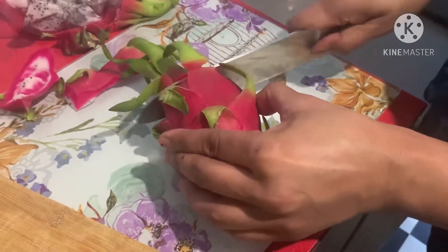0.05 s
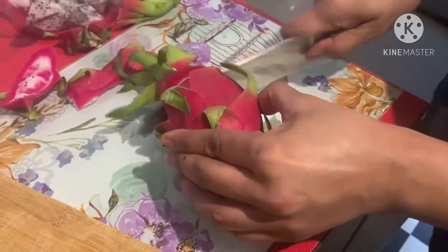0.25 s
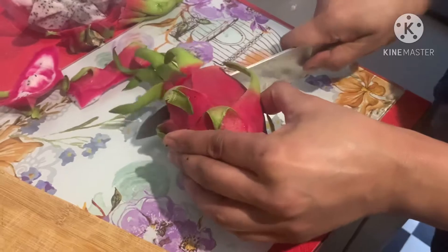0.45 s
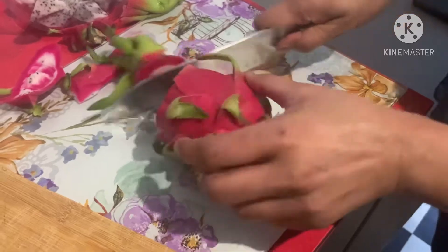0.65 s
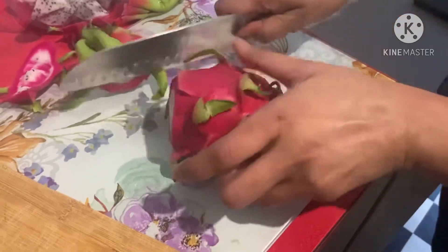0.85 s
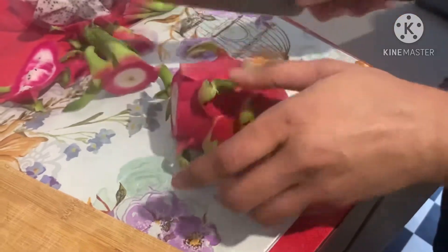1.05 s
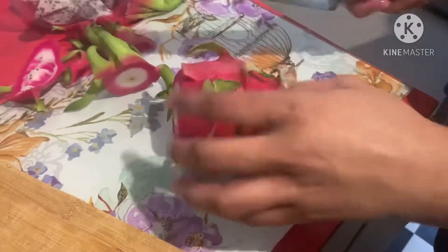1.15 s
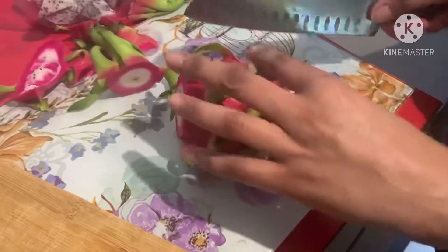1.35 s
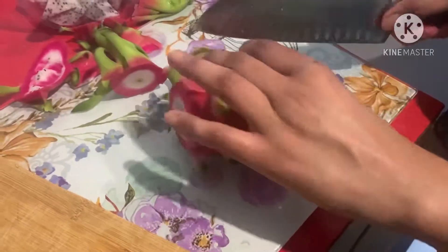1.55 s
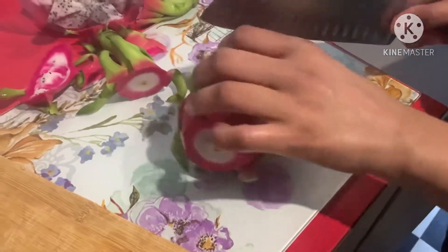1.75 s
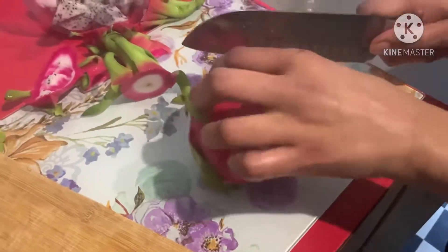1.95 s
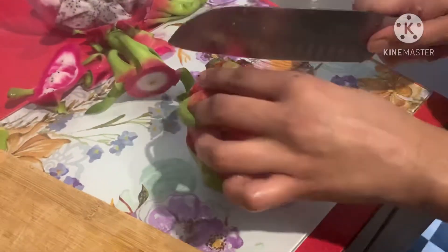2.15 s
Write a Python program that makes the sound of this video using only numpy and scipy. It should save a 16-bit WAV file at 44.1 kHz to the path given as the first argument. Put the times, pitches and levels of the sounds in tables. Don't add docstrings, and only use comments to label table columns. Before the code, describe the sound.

A knife cut through fruit, close up in stereo. Crisp wet rustling opens the first 0.15 seconds; at 0.2 a sharp snap leads to a gritty skid, a brief falling squeal and a hard knock with tiny bounces by 0.25, ringing shortly in the room. A small tick comes near 0.67, then faint finger rustles, with light ticks and dull pops around 1.9-2.1. Low airy rumble, wavering motor hum and slight hiss continue throughout.

```python
import sys
import numpy as np
from scipy import signal
from scipy.io import wavfile
from scipy.ndimage import uniform_filter1d

SR = 44100
rng = np.random.default_rng(int(sys.argv[2]) if len(sys.argv) > 2 else 0)


def digitize_waveform(pressure):
    field = np.atleast_2d(pressure).T
    bounded = np.clip(field, -1, 1)
    quanta = np.round(bounded * 32767).astype(np.int16)
    wavfile.write(sys.argv[1], SR, quanta)


def linear_from_db(decibels):
    return 10 ** (np.asarray(decibels, float) / 20)


N = 97020


def evened(x):
    return x / np.sqrt(np.mean(x ** 2) + 1e-20)


def read(points, hz):
    f, value = np.transpose(points)
    return np.interp(np.log(hz + 1), np.log(f + 1), value)


def highpass(x, hz):
    return signal.sosfilt(signal.butter(2, hz, "high", fs=SR, output="sos"), x)


def resonate(x, hz, width_hz):
    pole = np.exp((2j * hz - width_hz) * np.pi / SR)
    return 2 * signal.lfilter([1 - abs(pole)], [1, -pole], x).real


def resonate_twice(x, hz, width_hz):
    return resonate(resonate(x, hz, width_hz), hz, width_hz)


def grit(per_s, spread_db):
    sign_and_size = rng.standard_normal((3, N))
    unevenness = linear_from_db(spread_db * np.minimum(rng.exponential(1, (3, N)), 4))
    present = rng.random((3, N)) < per_s / SR
    clicks = sign_and_size * unevenness * present
    return evened(clicks[:2] + 0.59 * clicks[2])


def hiss():
    level_db, low_cut_hz = -78.5, 6000
    return linear_from_db(level_db) * highpass(rng.standard_normal((2, N)), low_cut_hz)


# (frequency [Hz], density [dB/Hz])
AIR_SPECTRUM = [(25, -30.5), (60, -22), (150, -19), (300, -21.5), (450, -27.5), (700, -35.5), (2000, -46),
                (5000, -59), (15000, -68.5)]
# (frequency [Hz], correlation [-])
AIR_LIKENESS = [(60, .9), (130, .92), (290, .7), (640, .25), (1400, .1), (3000, 0.01)]
# (time [s], level on the air [dB])
AIR_SWELL = [(0, -1.5), (.18, -5.5), (.3, 3.5), (.5, 5), (.67, -1), (0.779, 2.5), (.92, 4), (1.0, 0),
             (1.15, 3), (1.45, -.5), (1.7, -2), (1.86, -2), (1.945, -0.03), (1.961, -7), (1.99, -5.5),
             (2.01, 0), (2.2, 2.5)]


def air():
    level_db, patch_db, hop = -54.5 - 3.5, 2.2, 256
    frames, hz = N // hop + 5, np.fft.rfftfreq(1024, 1 / SR)
    a, b, c, d, patches = rng.standard_normal((frames, 513, 5)).T
    patches = uniform_filter1d(patches, size=12, axis=0)
    patches = evened(uniform_filter1d(patches, size=14, axis=1))
    likeness = np.clip(read(AIR_LIKENESS, hz), -1, 1)[:, None]
    left = a + 1j * b
    right = likeness * left + np.sqrt(1 - likeness ** 2) * (c + 1j * d)
    swell_db = np.interp(np.arange(frames) * hop / SR, *np.transpose(AIR_SWELL))
    spectrum_db = read(AIR_SPECTRUM, hz)[:, None] + patch_db * patches + swell_db
    z = np.array([left, right]) * linear_from_db(spectrum_db)
    return linear_from_db(level_db) * evened(signal.istft(z, nperseg=1024, noverlap=768)[1][:, :N])


# (centre [Hz], width [Hz], level [dB])
HUM_BANDS = [(50, 20, -68.5), (107.3, 6.7, -66), (189.5, 16, -62)]
# (time [s], main hum level [dB])
MOTOR_LOAD = [(0.0, -55), (0.12, -67), (0.24, -46.5), (0.29, -70), (0.51, -65), (0.56, -51), (0.69, -66.5),
              (0.73, -54), (1.1, -49), (1.14, -68), (1.21, -50), (1.33, -67), (1.379, -51.5), (1.51, -61),
              (1.54, -52.5), (2.01, -59.5), (2.04, -48), (2.2, -51)]


def hum():
    main_hz, main_width_hz = 150, 17
    noise = rng.standard_normal((3, N))
    noise = noise[2] + .25 * noise[:2]
    bands = np.zeros((2, N))
    for hz, width_hz, db in HUM_BANDS:
        bands += linear_from_db(db) * evened(resonate_twice(noise, hz, width_hz))
    main = resonate_twice(noise, main_hz, main_width_hz)
    envelope = abs(signal.hilbert(main.mean(0))) / main.std()
    main = main / (envelope + 1.4) / main.std()
    load_db = np.interp(np.arange(N) / SR, *np.transpose(MOTOR_LOAD))
    return (bands + evened(main) * linear_from_db(load_db)) * linear_from_db(np.array([[-1.2], [1.2]]))


# (time [s], level [dB], corner [Hz])
POPS = [
    (1.9015, -57.5, 599),
    (1.9405, -59.5, 903),
    (1.9514, -52.5, 898),
    (2.002, -50, 900),
    (2.0915, -52, 700),
    (2.112, -60, 500.6),
]


def pops():
    out, t = np.zeros(N), np.arange(400) / SR
    for s, db, hz in POPS:
        phase = np.pi * hz * t
        start = round(s * SR)
        out[start:start + 400] -= linear_from_db(db) * (1 - phase) * np.exp(-phase)
    return out


# (start [s], length [s])
STROKES = [(-.08, .13), (.015, .1), (.01, .11), (-.01, .13), (.1, .17), (.25, .38), (.38, .34), (.66, .055),
           (.66, .11), (.72, .15), (.88, .04), (.87, .07), (1.06, .14), (1.2, .09), (1.2, .09), (1.2, .08),
           (1.4, .05), (1.52, .05), (1.53, .03), (1.84, .1), (1.875, .085), (2.015, .04), (2.075, .04),
           (2.0, .2)]
# (level [dB], centre [Hz], width [Hz])
STROKE_COLOURS = [(-44.5, 12000, 14500), (-45.5, 15000, 15000), (-56.5, 790, 5800), (-58, 690, 50),
                  (-58.5, 6500, 9100), (-60, 350, 120), (-71, 7800, 16000), (-59.5, 1760, 4500),
                  (-70.5, 9200, 7900), (-74.5, 2330, 1100), (-70.5, 11200, 6400), (-72.5, 2400, 4600),
                  (-77.5, 2200, 2100), (-71.5, 3100, 1260), (-70, 1050, 330), (-79, 8800, 2300),
                  (-80, 2600, 5000), (-73.5, 1700, 1600), (-77.5, 10000, 3300), (-72, 1020, 530),
                  (-67.5, 8350, 470), (-63.5, 9100, 5500), (-72, 7700, 4600), (-79.5, 2800, 2200)]


def rustles():
    grains = grit(per_s=6000, spread_db=3.0)
    t, out = np.arange(N) / SR, np.zeros((2, N))
    for (s, length_s), (db, hz, width_hz) in zip(STROKES, STROKE_COLOURS):
        on = (t > s) & (t < s + length_s)
        arch = np.sin(np.pi * (t[on] - s) / length_s)
        out[:, on] += linear_from_db(db) * arch * evened(resonate_twice(grains[:, on], hz, width_hz))
    return out


# (time [s], peak level [dB], centre [Hz], width [Hz])
TICKS = [(.0295, -46, 9700, 1500), (0.035, -38, 3900, 795), (0.186, -45, 7900, 3000),
         (0.2007, -16.5, 10600, 2500), (0.215, -23.5, 6500, 2500), (0.671, -38, 4530, 7170),
         (.906, -62, 4020, 702.6), (0.915, -63.5, 6990, 3000), (1.321, -51, 12590, 6967),
         (1.887, -61.5, 8290, 1199), (1.897, -59.5, 8480, 1502), (1.901, -54, 8600, 1490),
         (1.91, -51.5, 9090, 2500), (1.928, -61.5, 8500, 1501), (1.94, -47.5, 8910, 1482),
         (1.943, -56, 9090, 1480), (1.949, -53, 9250, 1972), (.6705, -43, 1150, 500), (.672, -45, 800, 300),
         (.674, -46, 2000, 900), ]


def ticks():
    decay_s = .0006
    out, t = np.zeros((2, N)), np.arange(800) / SR
    for s, db, hz, width_hz in TICKS:
        noise = rng.standard_normal((3, 800))
        burst = (noise[2] + .5 * noise[:2]) * np.exp(-t / decay_s)
        snap = resonate_twice(burst, hz, width_hz)
        start = round(s * SR)
        out[:, start:start + 800] += linear_from_db(db) * snap / abs(snap).max()
    return out


# (start [s], end [s], start pitch [Hz], end pitch [Hz], waver width [Hz], level [dB])
SQUEAL = (0.2135, 0.2566, 2010, 1771, 89.5, -22)


def squeal():
    start_s, end_s, from_hz, to_hz, waver_hz, db = SQUEAL
    u = np.clip((np.arange(N) / SR - start_s) / (end_s - start_s), 0, 1)
    waver_rad = 0.69 * evened(resonate(rng.standard_normal(N), 0, waver_hz))
    pitch_hz = from_hz + (to_hz - from_hz) * u
    tone = np.sin(2 * np.pi * np.cumsum(pitch_hz) / SR + waver_rad)
    return linear_from_db(db + np.array([[-11], [0]])) * np.sin(np.pi * u ** 1.4) * tone


def ring(drive, modes, flip=-1):
    out = np.zeros((2, N))
    for k, (hz, left_db, right_db, t60_s) in enumerate(modes):
        decay = np.exp(-np.log(1000) / (t60_s * SR))
        width_hz = -np.log(decay) * SR / np.pi
        side = np.array([[1], [-1 if 1000 < hz < 1600 else 1]])
        level = linear_from_db(np.array([[left_db], [right_db]]))
        mode = resonate(drive, hz, width_hz) / (2 * (1 - decay))
        out += flip ** k * side * level * mode
    return out


# (frequency [Hz], left [dB], right [dB], t60 [s])
BOARD = [(160, -16, -16, .06), (300, -26, -24, .08), (370, -26, -25, .1), (450, -26, -24, .05),
         (638, -4, -14, .05), (773, -4, -13, .08), (895, -4, -11, .04), (1130, -10, -13, .02),
         (1420, -13, -5, .022), (1800, -10, -7, .018), (2150, -16, -12, .015)]
# (frequency [Hz], left [dB], right [dB], t60 [s])
BLADE = [(3620, -9, -5, .01), (3790, -7, -5, .012), (3965, -5, -3, .016), (4180, -8, -6, .012),
         (4300, -7, -4, .012), (4940, -14, -12, .02), (6200, -3, -6, .008), (7100, -8, -10, .008),
         (7950, -7, -6, .01), (9500, -18, -16, .005), (10800, -16, -16, .005), (13200, -20, -21, .005)]
# (time [s], level [dB], left minus right [dB], extra treble [dB])
SKID = [
    (0.201, -65, -0.5, 0),
    (0.202, -34, -1.5, 2),
    (0.214, -31.5, -5, 1),
    (.219, -25, -8.5, -14),
    (0.226, -17.5, -8.5, -13.5),
    (0.231, -20, -0.5, 3),
    (.241, -21, -1.5, 1),
    (.247, -35, -1, -1),
    (.27, -48, 0, 0.5),
]
# (time [s], level [dB], left minus right [dB])
CATCHES = [(.2142, -24, 3.5), (.2218, -14.5, -11), (0.2238, -14, -12.5), (.2252, -13, -9),
           (0.2268, -5, -11), (.2297, -11.5, 3), (0.2331, -6.5, 7), (0.2359, -9, -0.5), (0.2365, -13, 3),
           (0.2394, -10, -2), (0.2446, -13.5, 1.5), (0.2599, -22.5, -1.5)]
BLOW_S = [
    .2025,
    .218,
    .2298,
    .2324,
    .2384,
    .2458,
]
BLOW_DB = [-34, -26.5, -5.5, -16, -18.5, -23]


def knock():
    t, half = np.arange(N) / SR, np.array([[.5], [-.5]])
    s, db, pan_db, top_db = np.transpose(SKID)
    pressure_db = np.interp(t, s, db, -150, -150) + half * np.interp(t, s, pan_db)
    slips = grit(per_s=6000, spread_db=3.9) * linear_from_db(pressure_db)

    blows = np.zeros(N)
    blows[np.round(np.array(BLOW_S) * SR).astype(int)] = linear_from_db(np.array(BLOW_DB))
    blows = uniform_filter1d(blows, size=5)

    catches = np.zeros((2, N))
    for s_at, catch_db, side_db in CATCHES:
        start = round(s_at * SR)
        burst = evened(rng.standard_normal(12))
        catches[:, start:start + 12] += linear_from_db(catch_db + half * side_db) * burst

    crunch = linear_from_db(-21.0) * ring(slips, BLADE) + linear_from_db(-30) * ring(slips, BOARD)
    crunch = crunch + linear_from_db(-3) * resonate(slips, 2700, 3500)
    bright_hz = 8700
    top = highpass(highpass(crunch, bright_hz), bright_hz)
    crunch = crunch + (linear_from_db(np.interp(t, s, top_db)) - 1) * top

    landing = ring(blows, BOARD, flip=0.94) + linear_from_db(-15) * ring(blows, BLADE)
    return highpass(crunch + linear_from_db(-15) * ring(catches, BLADE) + landing, 180)


def tail(x, t60):
    taps = np.zeros((2, SR))
    at = np.arange(200, SR - 20, 20) + rng.integers(0, 20, (2, (SR - 201) // 20))
    np.put_along_axis(taps, at, rng.choice([-1., 1.], at.shape), 1)
    hz, t, z = signal.stft(taps, SR, nperseg=256)
    h = signal.istft(z * linear_from_db(-60 * t / t60(hz)[:, None]), SR, nperseg=256)[1]
    return signal.fftconvolve(x, h / np.linalg.norm(h[0]), axes=1)[:, :N]


# (frequency [Hz], t60 [s])
TABLE_TOP = [(300, 0.26), (2000, 0.23), (13000, 0.087)]
# (frequency [Hz], t60 [s])
ROOM = [(150, 0.9), (500, 0.24), (1000, 0.66), (2000, 0.85), (4000, 0.68), (8000, 0.5), (13000, 0.3)]


def scene():
    near_db, far_db = -9.5, -19
    background = hiss() + air() + hum()
    close = rustles() + ticks() + squeal() + knock()
    near = tail(close, lambda hz: read(TABLE_TOP, hz))
    far = tail(close[::-1], lambda hz: read(ROOM, hz))
    return background + pops() + close + linear_from_db(near_db) * near + linear_from_db(far_db) * far


def low_pass(x):
    return signal.sosfilt(signal.butter(12, 15720, fs=SR, output="sos"), x)


# (centre [Hz], width [Hz], threshold [dB])
MUTED = [(11950, 800, -62)]
# (start [s], end [s], centre [Hz], width [Hz])
DROPPED = [(.03, .14, 7300, 330), (.03, .16, 4950, 330), (.35, .47, 13300, 2300), (.3, .66, 11700, 900),
           (.37, .45, 5400, 450), (.49, .66, 5400, 600), (.5, .6, 7400, 350), (.73, .88, 7250, 600),
           (.72, .87, 5200, 500), (1.0, 1.2, 5200, 400), (1.4, 1.62, 5300, 450), (1.45, 1.7, 7300, 500),
           (1.85, 2.0, 7350, 750), (1.86, 1.97, 5200, 600), (2.02, 2.12, 5250, 500)]


def record(dry):
    edge_hz, edge_db = 14300, -34
    hz, t, z = signal.stft(dry, SR, nperseg=512)
    z = z * linear_from_db(edge_db * np.clip((hz - edge_hz) / 300, 0, 1))[:, None]
    for centre_hz, width_hz, floor_db in MUTED:
        band = abs(hz - centre_hz) < width_hz / 2
        power = uniform_filter1d((abs(z[:, band]) ** 2).mean((0, 1)), size=3)
        z[:, band] *= np.where(power > linear_from_db(2 * floor_db), 1, .03)
    for start_s, end_s, centre_hz, width_hz in DROPPED:
        band = (abs(hz - centre_hz) < width_hz / 2)[:, None]
        z = z * np.where(band & (t > start_s) & (t < end_s), .06, 1)
    mix = signal.istft(z, SR, nperseg=512)[1][:, :N]
    return low_pass(mix)


dry = scene()
out = record(dry)
digitize_waveform(out)
```